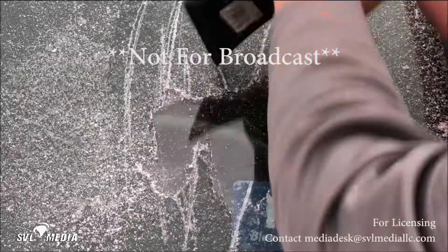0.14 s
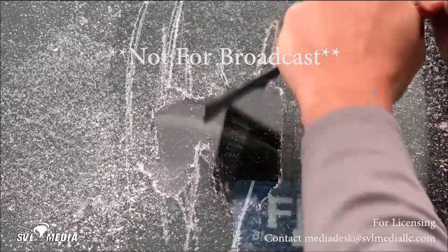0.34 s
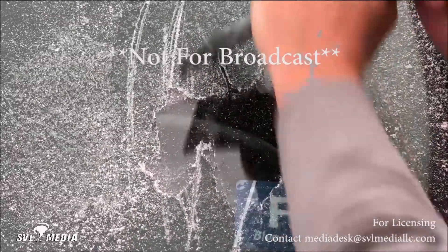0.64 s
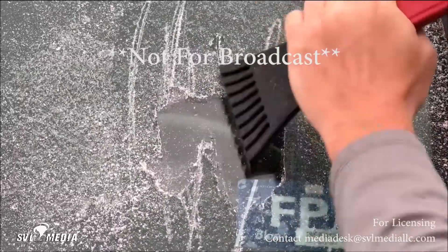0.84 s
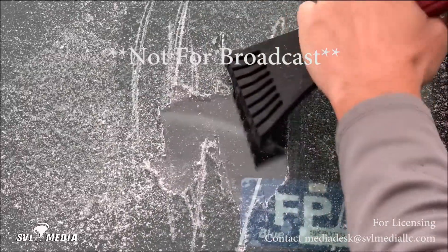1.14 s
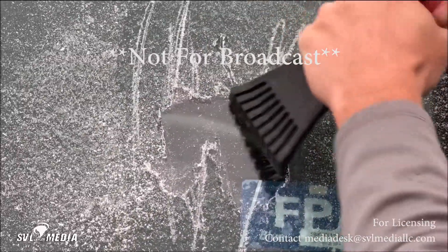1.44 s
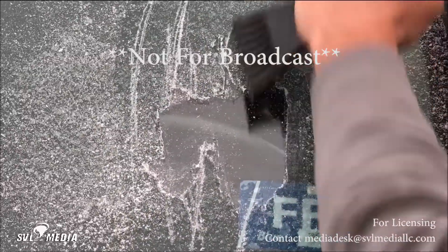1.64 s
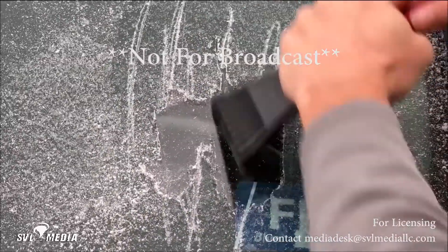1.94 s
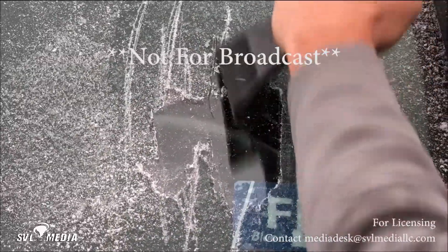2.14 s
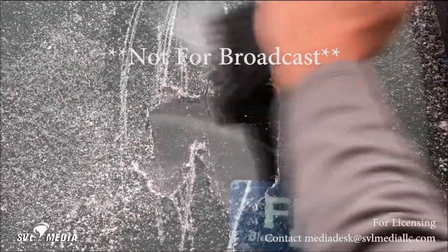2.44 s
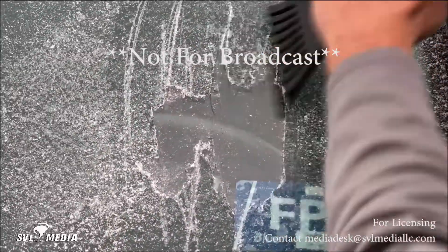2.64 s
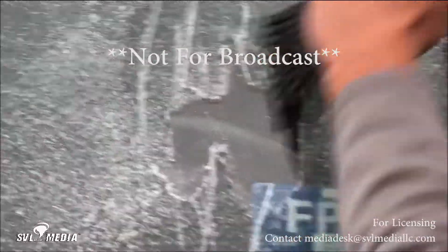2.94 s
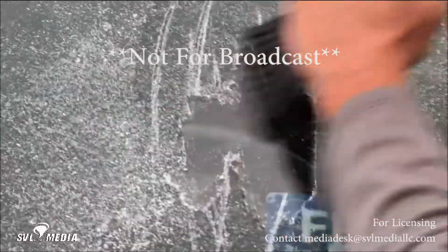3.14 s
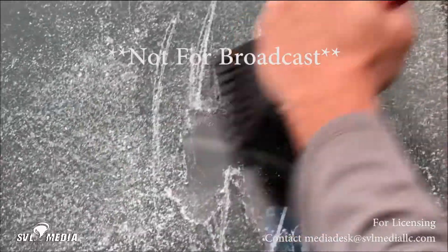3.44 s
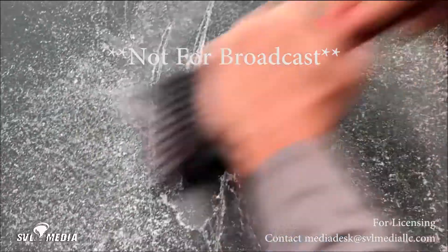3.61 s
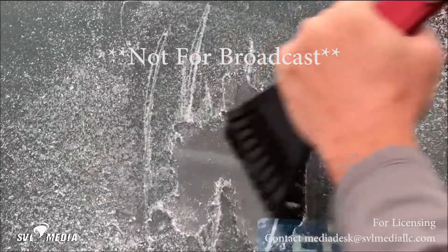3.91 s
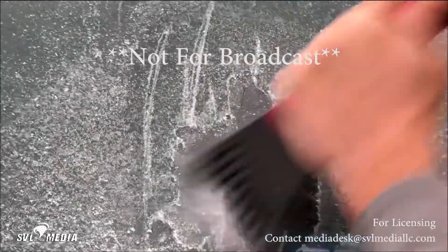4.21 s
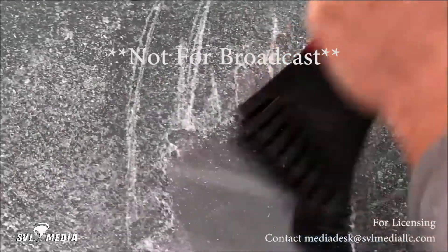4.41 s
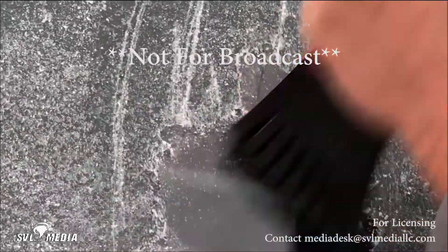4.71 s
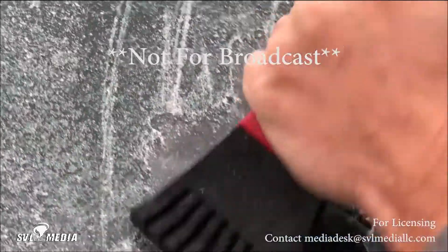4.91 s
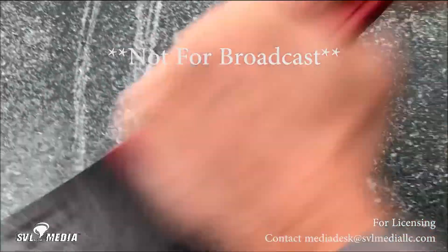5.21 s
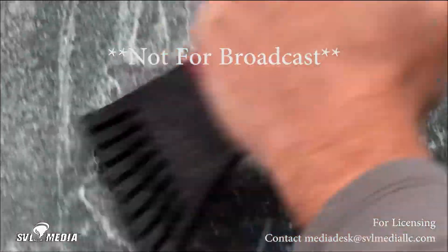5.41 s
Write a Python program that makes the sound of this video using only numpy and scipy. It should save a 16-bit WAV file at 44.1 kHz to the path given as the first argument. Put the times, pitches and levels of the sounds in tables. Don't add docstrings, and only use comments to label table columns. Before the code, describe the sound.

Close, brittle scraping of frost from glass: short crunchy bursts, cracking ice, brief plastic chirps and dull pane knocks above faint rumble.

```python
import sys
import numpy as np
from scipy import signal
from scipy.fft import rfft, irfft
from scipy.io import wavfile
from scipy.ndimage import uniform_filter1d

SR = 44100
rng = np.random.default_rng(int(sys.argv[2]) if len(sys.argv) > 2 else 0)


def wav_out(sig):
    wavfile.write(sys.argv[1], SR, np.round(np.clip(np.atleast_2d(sig).T, -1, 1) * 32767).astype(np.int16))


def invert_db(x):
    u = np.asarray(x, float) / 20
    return 10 ** u


N = 245195
T = np.arange(N) / SR

# (frequency [Hz], density [dB])
HUM_SPECTRUM = [(15, -40), (25, 21.5), (115, 21), (500, 9), (631, -32), (906, -26), (1870, -5), (2360, -12),
                (3950, -27), (7350, -23), (12000, -83), (15600, -49), (22000, -120)]
# (time [s], level [dB])
HANDLING = [(0, -48), (.5, -57), (1.05, -52.5), (2.1, -41.5), (2.45, -52), (2.8, -41), (4.2, -46),
            (4.55, -48), (4.7, -37), (5.56, -49)]
THIN_MOMENTS = [0.974, 1.143, 1.329, 1.677, 1.802, 1.972, 2.031, 2.212, 2.516, 2.715, 3.976, 4.02, 4.107,
                4.563, 5.136, 5.366]

# (time [s], blade over ice [dB], glass over ice [dB])
GRIP = [(0, -3, -2), (.225, -27, -3), (.395, -7.5, -5), (.535, -8.5, -1), (.785, -3, -1.5), (1.1, 0.5, 1.5),
        (1.685, -7, -8), (1.88, -15, -1.5), (2.11, 0, -3.5), (2.3, -6, -4.5), (2.44, -3, -6),
        (2.51, -31, -1), (2.65, -3, -2), (2.77, -30, 1), (2.94, 0, 4.5), (3.07, -27, 5), (3.19, 2.5, 7),
        (3.335, -32, -5), (3.375, -30, 3), (3.5, 1, 7), (3.68, -5.5, -1.5), (3.8, 0.5, 1),
        (3.98, -2.5, 6.5), (4.3, -16.5, -7), (4.42, -5, -5), (4.58, -2.5, 0), (4.88, -1.5, 5),
        (5.06, 2, -3), (5.3, -8, -12), (5.415, 4.5, -8)]
# (time [s], level [dB])
REST = [(0.0, -56), (0.65, -59), (1.05, -52), (1.24, -59.5), (1.5, -54), (1.61, -71), (1.7, -50),
        (1.83, -58.5), (2.09, -57), (2.43, -56), (2.77, -53), (3.53, -59.5), (3.84, -55), (4.01, -51),
        (4.23, -65), (4.29, -64), (4.57, -51), (4.68, -57), (5.31, -58), (5.56, -42.5)]
# (time [s], length [ms], starting level [dB], change [dB])
SLIDES = [(.012, 34.3, -27, 0), (.11, 27, -31, 3), (.136, 16.6, -20, -0.5), (.259, 31, -13, -1),
          (.425, 17, -12.5, -6.5), (.448, 17, -18.5, -14), (.571, 16.8, -15, -0.5),
          (.6235, 21.3, -12, -2.5), (.794, 57, -45.5, 2), (.847, 44.4, -28, -5), (1.72, 27.7, -20.5, -13),
          (1.751, 17, -19.5, -8), (1.78, 77, -25, -14.5), (1.919, 60.6, -27, 4.5), (1.983, 24, -33.5, -10),
          (2.15, 27.7, -20, -5.5), (2.188, 35, -23, -14), (2.458, 75, -28, -8), (2.702, 47, -25.5, 1.5),
          (2.975, 43.6, -31, -0.5), (3.018, 45, -33, -12), (3.41, 21.5, -15.5, -11.5),
          (3.661, 27, -22.5, -12), (3.779, 32.5, -17, -11), (3.812, 173, -45, 11), (4.15, 54, -51, -1.5),
          (4.322, 35.5, -35.5, 21.5), (4.593, 22, -26.5, -15), (5.31, 26, -47, 6),
          (5.337, 55.8, -20.5, 4.5), (5.424, 110, -39, -7)]
# (time it breaks free [s], build-up [ms], peak level [dB])
LOADS = [(0.57, 13, -17), (0.605, 15, -12.5), (1.916, 25.4, -20), (2.575, 38.4, -7.5), (2.609, 26, -12.5),
         (2.698, 27, -22), (2.847, 53, -10.5), (2.974, 16, -20.5), (3.116, 35.8, -14), (3.169, 81, -18),
         (3.298, 73, -29.5), (3.322, 20, -23), (3.352, 5.8, -9.5), (3.409, 18, -13.5), (3.482, 43, -11.5),
         (3.622, 75, -31), (3.645, 13, -22.5), (3.711, 16.8, -13.5), (3.762, 20, -27), (4.37, 3.9, -15),
         (4.396, 5.4, -12), (4.488, 58, -15.5), (4.642, 14.5, -17), (4.689, 28, -38), (4.953, 7, -24.5),
         (5.102, 18, -24.5)]
# (time [s], dying time [ms],
# peak level [dB])
BITES = [(.232, 17.5, -10.5), (0.251, 3.4, 8), (0.301, 6.9, -5.5), (.009, 4.8, -12), (0.021, 7.6, -17),
         (2.695, 7.7, -16), (1.712, 8.2, -7.5), (1.771, 22, -16), (2.1259, 5.1, -3.5), (2.176, 17, -18.5),
         (2.357, 21, -14.5), (2.368, 4.3, -8), (2.577, 38, -10.5), (2.614, 6.6, -0.5), (3.12, 23, -13.5),
         (3.134, 31, -11), (3.352, 19, -16.5), (3.427, 4.1, 3), (3.437, 13, -5.5), (3.456, 24, -8.5),
         (3.711, 48, -9), (3.728, 9.9, -2), (3.74, 17, -4.5), (3.76, 20, 1.5), (4.356, 6.2, -2.5),
         (4.371, 55, -4), (4.433, 13, -12), (4.688, 16.7, -8.5), (4.989, 7.7, -2), (5.001, 38, -19),
         (2.848, 10.6, -4.5), (2.858, 17.3, -3), (2.603, 12.5, -6), (0.44, 17, -17), (1.981, 4.8, -11.5),
         (3.359, 9.4, -12), (3.163, 8.5, -8), (2.151, 10, -8), (4.407, 10, -3), (5.344, 7.2, -16),
         (5.361, 5.8, -16), (0.599, 4, -8), (0.264, 8, -0.5), (0.285, 4.9, -13), (0.633, 5.7, -18),
         (3.635, 38, -25), (5.079, 3.8, -5.5), (5.105, 37, -20), (5.328, 60, -9.5),
         (.403, 33, -18), (0.053, 7.4, -29), (.072, 9, -36), (.206, 6.2, -44), (0.614, 8.8, -30),
         (2.003, 9.9, -31), (2.221, 8.6, -29.5), (3.93, 120, -36.5), (4.015, 32, -35), (0.54, 12.5, -16.5),
         (.605, 4.6, -24), (.891, 33, -42), (.943, 28, -30.5), (1.013, 20, -25), (1.127, 57, -27),
         (1.489, 52, -32.5), (1.693, 21, -16), (1.705, 21, -17.5), (2.12, 8.7, -10), (2.135, 60, -17.5),
         (2.311, 35, -31), (2.344, 62, -29), (2.618, 20, -28), (2.751, 43, -23), (2.865, 17, -43),
         (3.29, 11.4, -18.5), (3.323, 39, -26), (3.62, 5.8, -14.5), (3.986, 83, -37), (4.398, 27, -22),
         (4.493, 34, -22), (4.779, 7, -51), (4.8, 36, -53), (5.03, 8.4, -38), (5.038, 32, -46),
         (0.968, 18, -34), (1.067, 5.5, -43), (1.172, 9.1, -38), (4.643, 19.5, -14), (4.892, 18, -33.5),
         (4.953, 43, -28), (5.389, 32, -25), (2.453, 15.4, -16.5), (2.695, 12, -29)]
# (time [s], peak level [dB])
RELEASES = [(.291, -31), (0.613, -30), (0.646, -23), (2.619, -19), (2.866, -15.5), (3.02, -28),
            (3.17, -17.5), (3.473, -9.5), (3.483, -34), (3.698, -3.5), (3.745, -25), (4.323, -13.5),
            (4.695, -16.5), (4.891, -25), (5.03, -32.5)]
# (time [s], peak level [dB], blade over peak [dB], glass over peak [dB])
TAPS = [(0.074, -42, -10, -13), (0.343, -47, -9, 28.5), (0.3704, -43.5, 4, 24), (0.8207, -19.5, -17, -17),
        (0.862, -12, -1, -20), (0.906, -20, -15, -15), (0.9837, -37, 11, 21), (1.0964, -35, 6, 18.5),
        (1.236, -28, -8, 4), (1.252, -28.5, -3, 9), (1.3449, -35.5, 3, 11), (1.3607, -30.5, -19, 3),
        (1.563, -46.5, 18.5, 23.5), (1.6415, -25.5, -29, -3), (1.656, -25, -8, -37),
        (4.2166, -37.5, 18, 29), (4.809, -42, 12, -12), (5.17, -32.5, 3, -16), (5.224, -42, 13, 19),
        (5.283, -41, 17, 23), (5.496, -35, -10, -17)]

# (time [s], peak level [dB], frequency [Hz])
FLEXES = [(0.268, -32, 191), (.664, -28, 200), (.679, -26, 200), (.694, -33, 196), (2.882, -29, 196),
          (3.505, -13.5, 227), (2.616, -12, 144), (2.691, -22, 95), (2.758, -25, 152), (2.851, -21, 139),
          (3.12, -18, 163), (3.164, -21, 192), (3.435, -10, 167), (3.491, -9.5, 157), (3.744, -14, 161),
          (5.008, -11.5, 135), (5.038, -19, 140), (5.079, -29, 70), (5.352, -14.5, 137)]
# (time [s], peak level [dB], frequency [Hz])
KNOCKS = [(0.234, -11, 412), (0.25, 0.5, 590), (0.599, -7, 363), (.405, -12, 575), (.543, -27, 470),
          (0.654, -19, 267), (1.13, -19, 636), (1.503, -20.5, 620), (2.854, -4, 470), (3.406, -1.5, 627),
          (3.431, -5, 279), (3.469, 0, 520), (3.482, 5, 584), (3.702, -9, 496), (3.718, -9, 275),
          (3.759, -6, 265), (4.219, -15, 640), (4.399, -12, 266), (4.892, -19, 650), (5.015, -14, 287),
          (5.024, -12, 387), (5.034, -15, 384), (4.636, -12, 564), (4.692, -6.5, 1350), (5.388, -13.5, 197),
          (4.342, -8, 760), (5.282, -20, 570)]
# (frequency [Hz], level [dB], decay time t60 [s])
PANE_MODES = [(117, -28, 0.39), (148.2, -6, 0.35), (200, -4, 0.19), (275, 0, 0.071), (356.8, -5, 0.033),
              (419.6, -6, 0.048), (496, -6.5, 0.043), (595, -17.5, 0.14), (619.6, -0.5, 0.013),
              (736.7, -2, 0.13), (854, -4.5, 0.048), (960, -3, 0.035), (1106, -3.5, 0.16),
              (1373, -3, 0.074), (1481, -4, 0.016), (1761, -1.5, 0.066), (2102, -4.5, 0.026)]
# (time [s], length [ms], level [dB], frequency [Hz])
HELD_MODES = [(.108, 20, -32.5, 1780), (.135, 20, -28, 1800), (.135, 20, -28, 2110), (.14, 45, -35, 980),
              (.145, 33, -37, 1540), (.425, 15, -22, 2810), (.565, 48, -26, 980), (.625, 28, -22, 2070),
              (.635, 33, -32, 1036), (1.128, 17, -31, 1454), (1.128, 23, -42, 2780),
              (1.128, 17.5, -40, 3340), (.8, 57, -53, 2450), (1.31, 100, -57, 2535), (1.455, 92, -50, 2530),
              (1.78, 71, -36, 2390), (2.455, 240, -35, 680), (3.04, 23, -20.5, 660), (3.6, 47, -24, 595),
              (3.635, 11, -18, 870), (3.83, 93, -41, 2670), (3.88, 90, -38, 2720), (3.89, 120, -39, 1720),
              (4.15, 50, -50, 2660), (4.155, 44, -42, 626), (5.005, 38, -23.5, 766), (.66, 31, -42, 1100),
              (3.89, 69, -44, 727), (3.96, 65, -40, 604), (5.42, 150, -51, 2580), (5.35, 39, -32, 613),
              (4.634, 26, -24, 2980), (4.686, 9.9, -22, 2830), (4.483, 13, -12.5, 2640),
              (4.895, 20, -43, 2720), (1.127, 28, -51, 4630)]
# (time [s], peak level [dB], frequency [Hz])
SINGS = [(0.3726, -39, 2310), (0.4255, -6.5, 2270), (0.4405, -6.5, 2256), (0.4544, -16.5, 2290),
         (0.5834, -18, 2490), (0.821, -35, 2500), (0.8634, -20, 2290), (0.8834, -20.5, 2600),
         (1.561, -41, 2590), (1.6945, -18, 2290), (1.704, -11.5, 2317), (1.711, -19, 2330),
         (1.7204, -29, 2300), (1.726, -15, 2300), (1.7354, -14, 2340), (1.7424, -27, 2310),
         (1.7504, -9, 2370), (1.7549, -8, 2420), (1.7704, -27, 2580), (1.7836, -19, 2380),
         (1.7978, -28, 2300), (1.814, -30, 2420), (1.834, -38, 2470), (1.8494, -36, 2450),
         (1.9354, -23, 2300), (1.9617, -23, 2310), (1.9819, -14, 2280), (2.123, -21.5, 2360),
         (2.1365, -21, 2320), (2.1474, -11, 2320), (2.1525, -6, 2264), (2.1644, -10, 2360),
         (2.1734, -11, 2340), (2.1894, -19, 2340), (2.2, -17, 2510), (2.2114, -27.5, 2190),
         (2.4603, -41, 2190), (2.4794, -21, 2510), (2.4986, -29, 2380), (5.3589, -16.5, 2440),
         (5.475, -25, 2420)]
# (frequency [Hz], width [Hz], level [dB])
BLADE_MODES = [(4390, 160, 1), (6370, 200, 3.5), (7330, 160, 0.5), (8060, 120, 1.5), (10160, 300, 0.5)]

# (time [s], peak level [dB])
CRACKS = [(0.3014, -2), (0.624, 0), (0.848, -14), (0.8635, -16), (1.014, -20), (1.272, -39), (1.3897, -35),
          (1.7044, -10), (1.712, -9), (1.7212, -4.5), (1.7703, -6), (1.7797, -8), (1.9821, -7.5),
          (2.602, -2), (2.6134, -1), (2.6963, -3), (2.8474, -3), (2.8574, 2), (3.1126, -3), (3.118, 0),
          (3.137, 3), (3.616, -16), (4.357, -5), (4.4718, -1), (4.4797, -6), (4.4876, -1.5), (4.6889, 0.5),
          (4.9885, 0), (4.9948, -1.5), (5.002, -7), (5.1012, -8)]
# (frequency [Hz], density [dB])
ICE_SPECTRUM = [(530, 12), (900, -12), (991, -6), (2300, -5.5), (2570, 1), (4100, -14.5), (4630, -1.5),
                (7860, 6), (8760, -1), (11600, -3), (12700, -51), (14900, 7), (16000, -20)]
# (time [s], level [dB])
FINENESS = [(0, -5.5), (.5, -3), (1, -10), (1.6, -0.5), (2, -1.5), (2.3, 1), (2.9, 0), (3.3, 0), (3.75, -2),
            (3.9, 0.5), (4.1, -14), (4.3, 5.5), (4.5, -12), (4.69, 1), (5.0, 1), (5.1, 1), (5.35, -1),
            (5.56, 0)]

RISE_S, STOP_S = 0.0012, 0.00074
LOAD_RISE_DB, BITE_FALL_DB, RELEASE_MS = 18.5, 38, 49.6


def rms_one(x):
    return x / np.sqrt(np.mean(x ** 2) + 1e-20)


def drift(rate_hz):
    r = np.exp(-2 * np.pi * rate_hz / SR)
    return rms_one(signal.lfilter([1], [1, -2 * r, r * r], rng.standard_normal(N + SR))[SR:])


def bandpass(x, order, low_hz, high_hz):
    return signal.sosfilt(signal.butter(order, [low_hz, high_hz], "band", fs=SR, output="sos"), x)


def ring(x, hz, width_hz):
    r = np.exp(-np.pi * width_hz / SR)
    return signal.lfilter([1 - r, 0, r - 1], [1, -2 * r * np.cos(2 * np.pi * hz / SR), r * r], x)


def coloured(x, spectrum, patchy_db):
    hz, db = np.transpose(spectrum)
    count = int(3 * np.log2(hz[-1] / hz[0]) + 1.03)
    edges = np.geomspace(hz[0], min(hz[-1], 20000), count)
    out = 0
    for k, (low, high) in enumerate(zip(edges, edges[1:])):
        level_db = np.interp(np.log(low * high) / 2, np.log(hz), db) + patchy_db * drift(32.0)
        out = out + invert_db(level_db) * bandpass(x[k % 2], 2, low, high)
    return rms_one(out)


def grains(per_s, spread_db):
    sizes = invert_db(spread_db * np.minimum(rng.exponential(1, (2, N)), 3.8))
    sizes *= rng.choice([-1, 1], (2, N))
    return rms_one(sizes * (rng.random((2, N)) < per_s / SR) + 1e-9)


def thumps(blows, cycles):
    out, t = np.zeros(N), T[:SR // 5]
    for s, peak_db, hz in blows:
        i = round(s * SR)
        age = t * hz / cycles
        blow = invert_db(peak_db - 4.0) * age * np.exp(1 - age) * np.sin(2 * np.pi * hz * t)
        out[i:i + len(t)] += blow[:N - i]
    return out


def hum():
    rumble = rms_one(bandpass(rng.standard_normal(N), 2, 45, 130))
    rumble *= invert_db(np.interp(T, *np.transpose(HANDLING)) + 3 * drift(10))
    return invert_db(-46.5) * coloured(rng.standard_normal((2, N)), HUM_SPECTRUM, patchy_db=3.5) + rumble


def surroundings(x):
    lag = SR * np.clip(.0005 + .00015 * drift(3), .0001, .001)
    echo = np.interp(np.arange(N) - lag, np.arange(N), x)
    r = np.exp(-2 / (0.0088 * SR))
    stored = np.sqrt(signal.lfilter([1 - r], [1, -r], x ** 2))
    tail = bandpass(rng.standard_normal(N), 1, 700, 2600)
    return x + .5 * echo + invert_db(-2.0) * stored * tail


def touch(force, s, ms, start_db, change_db):
    i, length = round(s * SR), max(ms, 2) / 1000
    t = T[:min(N - i, round((length + STOP_S) * SR))]
    gate = np.clip(np.minimum(t / RISE_S, (length + STOP_S - t) / STOP_S), 0, 1)
    force[:, i:i + len(t)] += gate * invert_db(start_db + change_db * t / length)


def contact():
    touches = [*SLIDES]
    touches += [(s, ms, db, -BITE_FALL_DB) for s, ms, db in BITES]
    touches += [(s - ms / 1000, ms, db - LOAD_RISE_DB, LOAD_RISE_DB) for s, ms, db in LOADS]
    force, starts = np.zeros((3, N)), [s for s, *_ in GRIP]
    for s, ms, db, change_db in touches:
        judged_at = s + ms / 2000 * (change_db > 0)
        _, blade_db, glass_db = GRIP[max(np.searchsorted(starts, judged_at, "right") - 1, 0)]
        touch(force, s, ms, db + np.array([[0], [blade_db], [glass_db]]), change_db)
    for s, db in RELEASES:
        touch(force[2:], s, RELEASE_MS, db, -BITE_FALL_DB)
    force *= invert_db(2.0 * drift(100.0) + 1.1 * drift(240.0))
    for s, peak_db, blade_db, glass_db in TAPS:
        i = round(s * SR)
        t = T[:min(N - i, 1500)]
        shares = invert_db(peak_db - 8 + np.array([[0], [blade_db], [glass_db]]))
        force[:, i:i + len(t)] += shares * np.exp(-t / .003)
    rest_shares_db = np.array([[0], [3.5], [10]])
    rest = invert_db(np.interp(T, *np.transpose(REST)) + rest_shares_db)
    return force + rest * invert_db(1.63 * drift(12.5))


def glass(force):
    pushes, out = force * grains(3000.0, spread_db=2.5), 0
    for k, (hz, db, t60) in enumerate(PANE_MODES):
        lag = round(3.0 / hz * SR)
        late = np.roll(pushes[k % 2], lag) * invert_db(db + 3.0 * drift(14))
        width_hz = np.log(1000) / np.pi / (1.086 * t60)
        out = out + ring(late, hz, width_hz) / np.sqrt(hz)
    thud = bandpass(pushes[0], 2, 300, 1200)
    return invert_db(39.0) * out + invert_db(3.0) * thud


def held_modes():
    out = np.zeros(N)
    waver = 2 * np.pi * 80 * np.cumsum(drift(92.1)) / SR
    for s, ms, db, hz in HELD_MODES:
        i = round(s * SR)
        t = T[:min(N - i, round(ms / 1000 * SR))]
        swell = np.sin(np.pi * np.sqrt(t / (ms / 1000)))
        out[i:i + len(t)] += invert_db(db) * swell * np.sin(2 * np.pi * hz * t + waver[i:i + len(t)])
    return out * invert_db(5 * drift(120))


def blade(force):
    source = force * grains(4700.0, spread_db=3.0)[0]
    squeal = sum(invert_db(db) * ring(source, hz, width_hz) for hz, width_hz, db in BLADE_MODES)
    body = invert_db(6) * ring(source, 2610, 840) + invert_db(7.5) * ring(source, 2360, 180)
    return squeal + body + invert_db(0.5) * thumps(SINGS, cycles=7.1)


def cracks():
    gate, age = np.zeros(N), T[:600] / .0011
    for s, peak_db in CRACKS:
        i = round(s * SR)
        gate[i:i + len(age)] += invert_db(peak_db - 10.5) * age * np.exp(1 - age)
    puff = bandpass(rng.standard_normal(N), 1, 2200, 11000)
    return gate * rms_one(puff + invert_db(2.0) * ring(puff, 7160, 2500))


def ice(force):
    grit = grains(9000.0, spread_db=4.5)
    hz, db = np.transpose(ICE_SPECTRUM)
    pitches = np.geomspace(1000, 14000, num=36) * invert_db(0.36 * rng.standard_normal(36))
    rings = 0
    for k, f in enumerate(pitches):
        level = invert_db(np.interp(f, hz, db) + 5 * drift(14))
        rings = rings + level * ring(grit[k % 2], f, 50 + .012 * f)
    hiss = coloured(grit, ICE_SPECTRUM, patchy_db=4.0) + invert_db(-6.5) * rms_one(rings)
    dull = signal.sosfiltfilt(signal.butter(2, 9000, fs=SR, output="sos"), hiss)
    bright = invert_db(np.interp(T, *np.transpose(FINENESS))) * (hiss - dull)
    return force * (dull + bright) * invert_db(-1.5)


def scene():
    on_ice, on_blade, on_glass = contact()
    blows = thumps(FLEXES, cycles=0.91) + thumps(KNOCKS, cycles=0.93)
    scrape = surroundings(ice(on_ice)) + invert_db(-1.0) * blade(on_blade)
    return (scrape + glass(on_glass) + held_modes() + blows + hum() + cracks())[None]


def thin(x, keep_db):
    out, size = x.copy(), 1280
    fade = signal.windows.tukey(size, .4)
    for s in THIN_MOMENTS:
        i = round(s * SR) - size // 2
        lines = rfft(x[i:i + size] * fade)
        number = np.arange(len(lines))
        around = np.sqrt(uniform_filter1d(np.abs(lines) ** 2, size=60))
        strong = (np.abs(lines) > invert_db(keep_db) * around) & (number < 330)
        kept = strong | (number < 25)
        gain = np.maximum(kept, np.where(number < 300, .22, .07))
        out[i:i + size] += fade * (invert_db(3.0) * irfft(lines * gain) - x[i:i + size])
    return out


def low_pass(x):
    return signal.sosfilt(signal.butter(12, 16970, fs=SR, output="sos"), x)


def record(dry):
    x = signal.sosfilt(signal.butter(2, 60, "high", fs=SR, output="sos"), dry)
    x = .88 * np.tanh(x / .88)
    x = signal.sosfilt(signal.cheby2(14, 32, 16150, fs=SR, output="sos"), x)
    mix = thin(x[0], keep_db=3)[None]
    return low_pass(mix)


dry = scene()
out = record(dry)
wav_out(out)
```